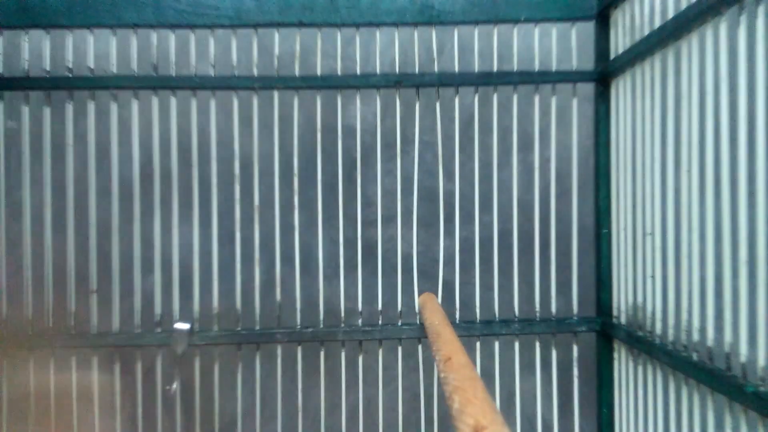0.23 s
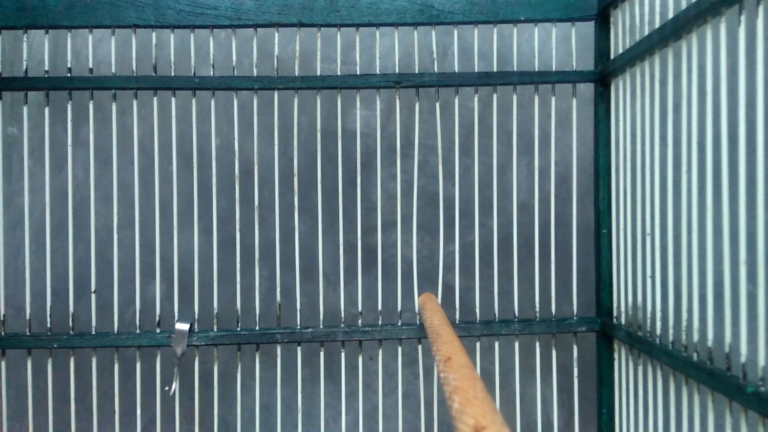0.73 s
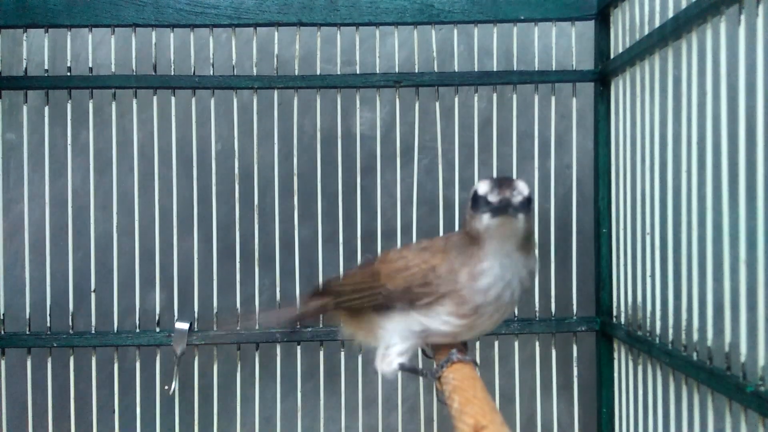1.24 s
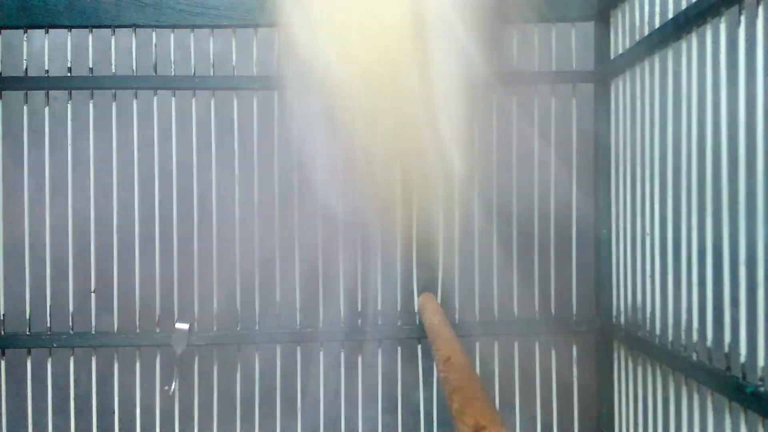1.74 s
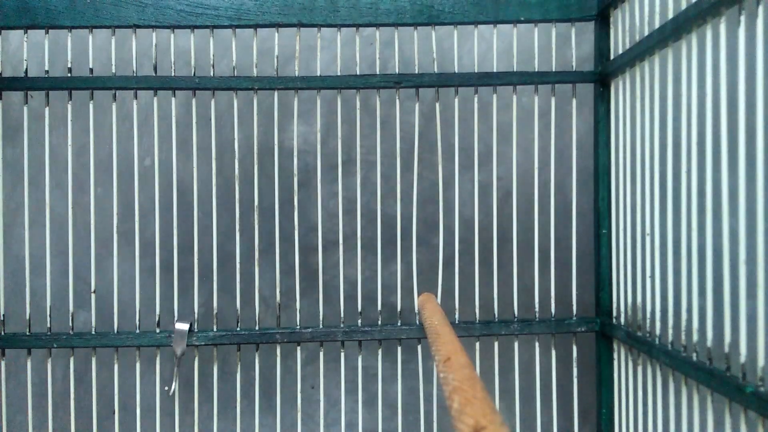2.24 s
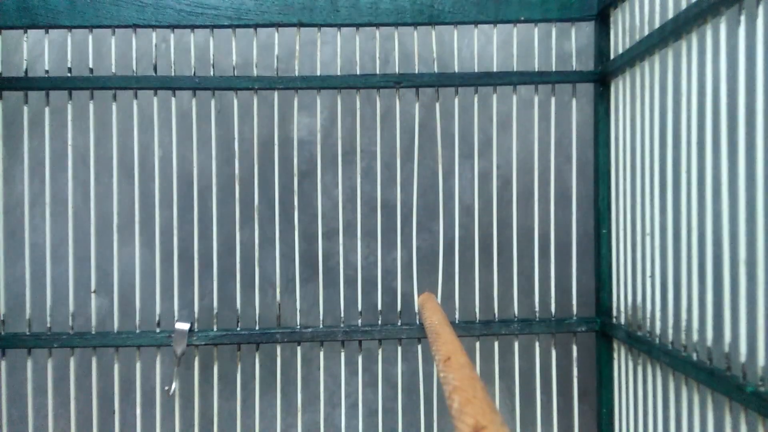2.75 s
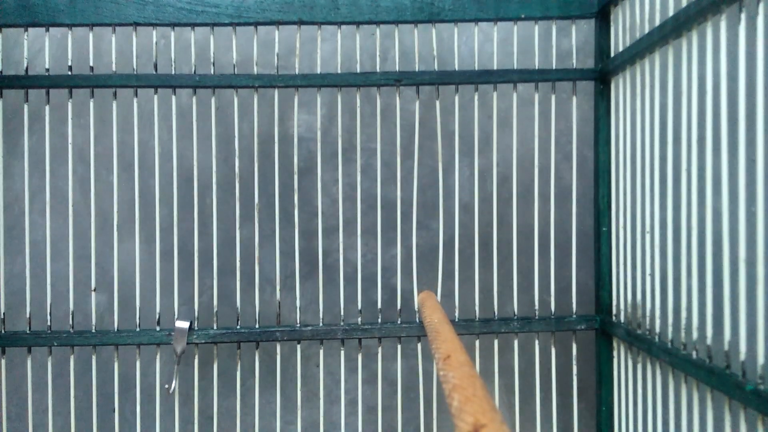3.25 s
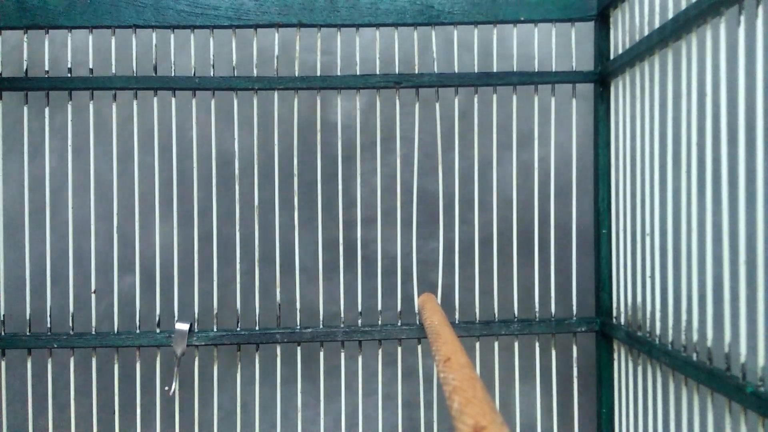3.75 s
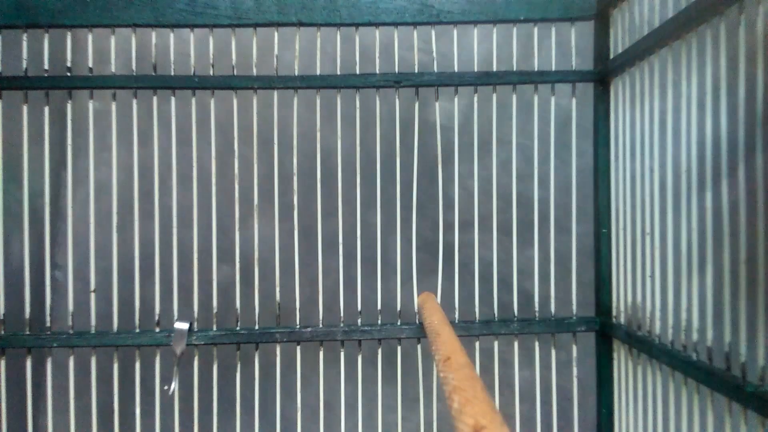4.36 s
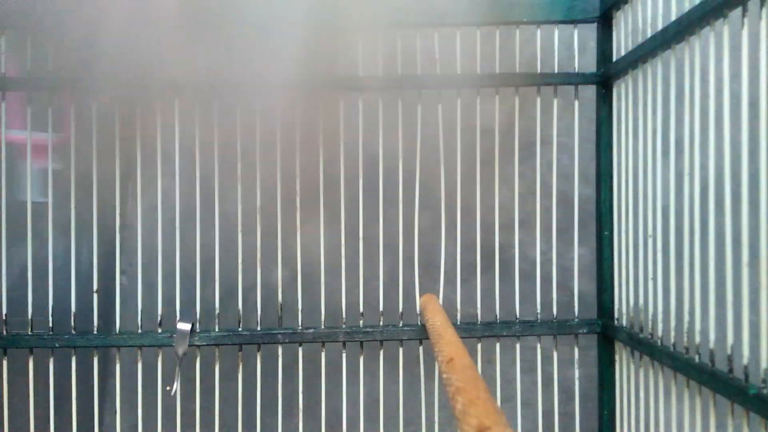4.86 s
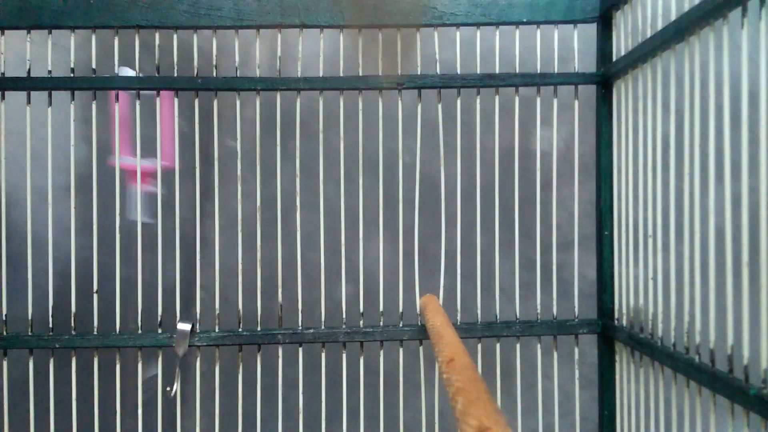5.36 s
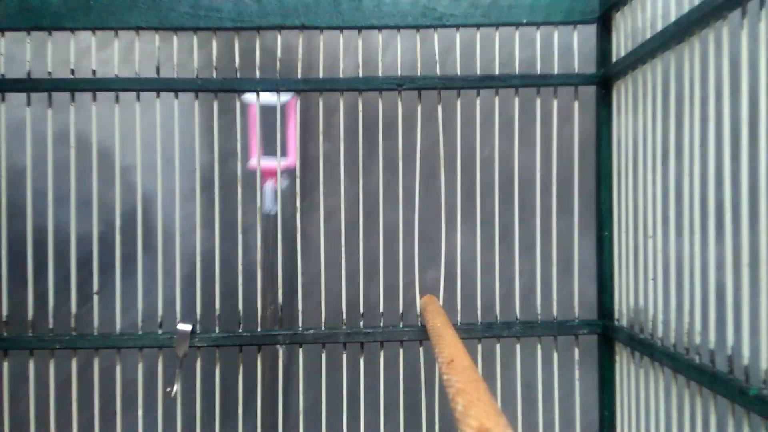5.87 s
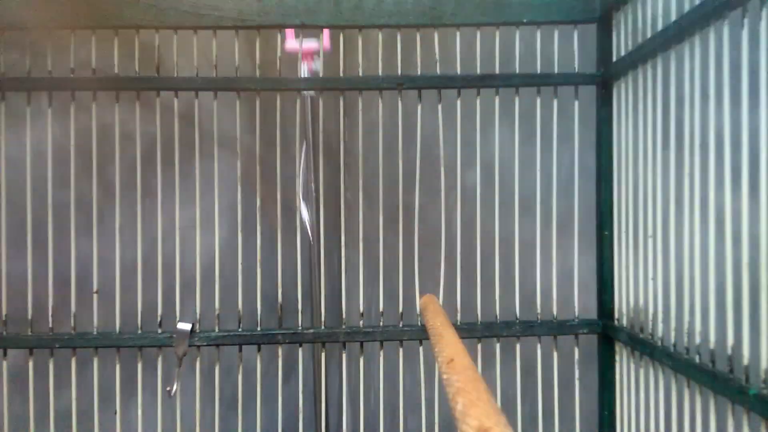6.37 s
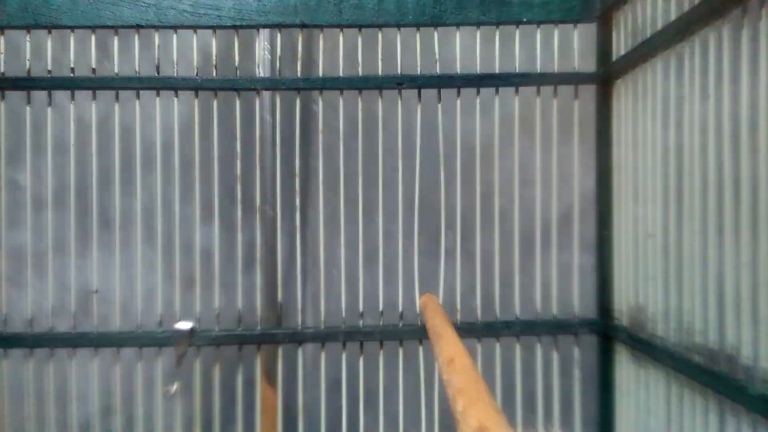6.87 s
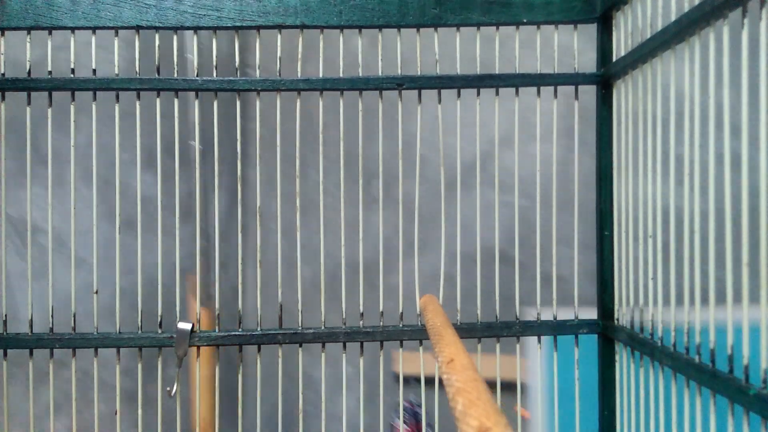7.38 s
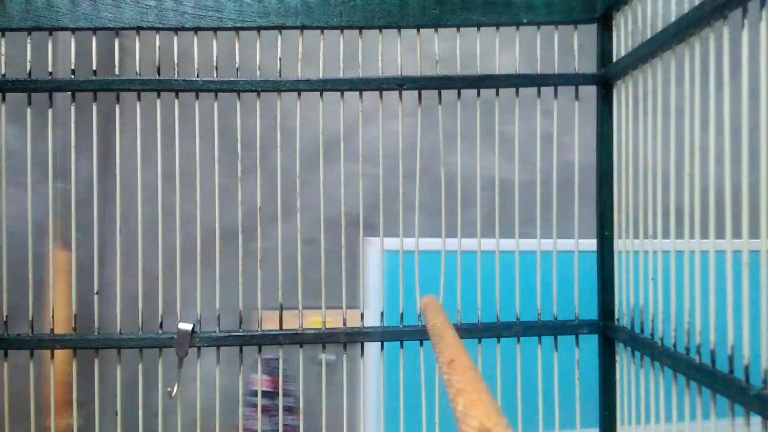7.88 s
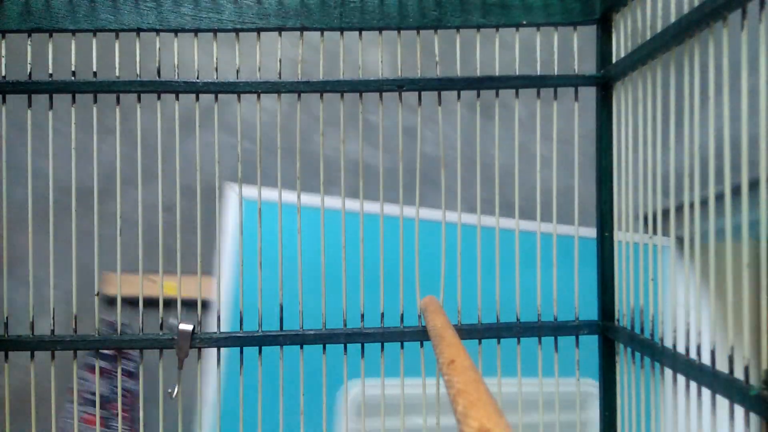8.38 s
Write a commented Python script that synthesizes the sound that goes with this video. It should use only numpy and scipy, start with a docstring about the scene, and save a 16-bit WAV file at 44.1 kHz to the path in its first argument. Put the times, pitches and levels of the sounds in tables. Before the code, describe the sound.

Right beside the microphone, a small bird flaps around a wire cage. Rapid feathery strokes hiss and rasp over the bars, thin out, then return briefly. A quiet indoor pause holds a few dull, distant knocks. Then longer, rougher fluttering breaks out with claw snaps, frame rattles and soft low puffs of air, ending in sharp clicks, faint swishes and one last short flap.

```python
"""A small bird flutters about a wire cage in several bursts, right beside the microphone.
Its feathers brush the bars as grainy noise; its claws and beak snap, scrape and ring the frame and wires.
Its wings push puffs of air: short low pressure swings in a noisy draught.
In a pause a few dull knocks, of noise and dying sines, sound farther off.
Faint swishes and a low noise floor fill the quiet room; a hiss suppressor and a band limit follow."""
import sys
import numpy as np
from scipy import signal
from scipy.fft import rfft, irfft, next_fast_len
from scipy.io import wavfile
from scipy.ndimage import uniform_filter1d

SR = 44100
rng = np.random.default_rng(int(sys.argv[2]) if len(sys.argv) > 2 else 0)


def transcribe(signal):
    """Save signal, clipped to [-1, 1], as a 16-bit WAV file at the path in sys.argv[1]."""
    frames = np.atleast_2d(signal).T
    limited = np.clip(frames, -1, 1)
    pcm = np.round(limited * 32767).astype(np.int16)
    wavfile.write(sys.argv[1], SR, pcm)


N = 381465

# Spectrum of barbs on bars: [f/Hz, relative density/dB]
HISS_SPECTRUM = [(2500, -34), (4200, -15.5), (5500, -7), (7200, 0), (8700, 5), (10500, 2), (12000, -2),
                 (14500, -4.5)]
# Spectrum of quills on bars: [f/Hz, relative density/dB]
RASP_SPECTRUM = [(900, -36), (1600, -1), (2100, 1.5), (2800, 1), (3600, -1), (4600, -4), (6000, -1),
                 (9000, -35.5)]
# Spectrum of the feather rush: [f/Hz, relative density/dB]
BODY_SPECTRUM = [(120, -13.5), (200, -14), (290, 0), (600, 1), (1000, 3.5), (1500, 2), (2100, -7),
                 (3200, -18.5), (5000, -37.5)]
# Resonances of cage and tray: [f/Hz, width/Hz, gain/dB]
CAGE_RESONANCES = [(328, 45, 4), (372, 30, -11), (452, 45, 4), (522, 40, -6), (592, 45, 3), (670, 70, -3),
                   (1030, 100, 3), (1640, 70, 2), (1980, 90, 2)]


def feathers(slide_trims_db=(1, -4, 1), stroke_trims_db=(-7, -4, -2)):
    """Many barbs drag over the bars: a fine hiss, a rasp of quills and a rush that the cage colours."""
    fine, coarse, _ = flurries()
    slides = [fine, np.sqrt(fine * coarse), coarse]  # rasp lies midway between hiss and body
    slide_gains = amp(slide_trims_db)[:, None]
    stroke_gains = amp(stroke_trims_db)[:, None]
    power = slide_gains ** 2 * slides + stroke_gains ** 2 * strokes()
    # single feathers catch and slip
    hiss, rasp, body = np.sqrt(power) * flicker(rate_hz=200, depth_db=0.34)
    high = colour(hiss * grainy(share=0.42, per_s=7600), HISS_SPECTRUM)
    middle = colour(rasp * grainy(share=0.17, per_s=820), RASP_SPECTRUM)
    low = colour(body * grainy(share=0.27, per_s=290), BODY_SPECTRUM, CAGE_RESONANCES)
    return patchy(high, depth_db=2.34, size=512) + patchy(middle + low, depth_db=2.0, size=1024)


# Spells of fluttering along the bars; levels before trims:
# [start t/s, length/s, hiss level/dB, body level/dB, draught level/dB]
FLURRY_SPELLS = [(0, .32, -41.5, -44.5, -44), (0.327, .31, -48.5, -51, -45),
                 (0.748, 0.057, -54.5, -59.5, -57), (0.916, 0.13, -57, -82, -56.5),
                 (1.807, 0.092, -54, -56, -57), (1.93, .15, -54, -53.5, -48.5),
                 (4.174, 0.25, -62, -68.5, -59.5), (4.426, 0.35, -47, -46.5, -46),
                 (4.587, 0.3, -49, -48.5, -43.5), (4.943, 0.35, -59.5, -56, -66),
                 (5.072, 0.45, -51, -58.5, -47.5), (5.563, 0.3, -43, -45, -41.5),
                 (5.895, 0.19, -38, -43, -53), (6.177, 0.05, -50.5, -49, -52),
                 (6.426, 0.11, -43.5, -43, -46), (6.527, 0.14, -53.5, -68.5, -70),
                 (6.95, 0.18, -53.5, -52.5, -49.5), (7.775, 0.38, -59.5, -67, -61),
                 (8, 0.064, -45, -46.5, -53)]
SWELL_S, SETTLE_DB_PER_S = 0.013, 176
BEATS_PER_S, BEAT_DB = 35, 3.5  # uneven small wingbeats


def flurries():
    """Power of hiss, body and draught over time: each flurry swells, holds and settles."""
    t = np.arange(3 * SR // 2) / SR
    power = np.zeros((3, N))
    for start_s, length_s, *levels_db in FLURRY_SPELLS:
        swell = np.minimum(t / SWELL_S, 1)
        settle = amp(-SETTLE_DB_PER_S * np.maximum(t - length_s, 0))
        add(power, start_s, (amp(levels_db)[:, None] * swell * settle) ** 2)
    return power * flicker(rate_hz=BEATS_PER_S, depth_db=BEAT_DB) ** 2


# Wing strokes against the bars; levels before trims:
# [t/s, hiss level/dB, rasp re hiss/dB, body re hiss/dB, t60/s]
WING_STROKES = [(0.072, -21, -18, -20, 0.12), (0.1486, -18.5, -16, -19, 0.2), (.2076, -22, -6.5, -13, 0.23),
                (0.3044, -29.5, -3, -3.5, 0.14), (.4394, -38, -12, 4.5, 0.12),
                (0.4723, -26, -22, -13.5, 0.33), (.511, -25, -12, -4, 0.1), (.5814, -39, -19, -11, 0.18),
                (.6297, -41.5, 8.5, 7, 0.047), (0.7784, -31.5, -14.5, -9, 0.43),
                (0.829, -38, -18.5, -3, 0.11), (0.952, -41.5, -20, -6, 0.4), (1.028, -46.5, -23, 0.5, 0.12),
                (1.145, -50.5, -23, -14.5, 0.33), (1.376, -54.5, -20.5, -18, 0.3),
                (1.821, -42, -25, -12, 1), (1.877, -41.5, -9.5, -2.5, 0.27), (1.9844, -37.5, -8, -20, 0.2),
                (2.0444, -31.5, -15.5, -6, 0.083), (2.096, -36.5, -10.5, -24, 0.46),
                (4.148, -48, -12, -22, 0.61), (4.2165, -43.5, -15, -5, 0.19), (4.379, -34, -3, -4, 0.09),
                (4.409, -32, 1.5, 1.5, 0.13), (4.4508, -26, -2.5, -19, 0.079), (4.562, -24.5, -3, -2, 0.11),
                (4.742, -29.5, -8.5, -3.5, 0.18), (4.7716, -27.5, -1, -5, 0.094),
                (5.0284, -39, -2, -12, 0.2), (5.114, -35, -5.5, -9.5, 0.3), (5.145, -37.5, -5, 6, 0.083),
                (5.3733, -30.5, -7, -3, 0.14), (5.471, -26, -16.5, -19.5, 0.2),
                (5.5493, -23.5, -10, -6, 0.24), (5.605, -22.5, -11, -7.5, 0.23),
                (5.662, -22.5, -15, -11.5, 0.2), (5.7716, -25, -11, -12.5, 0.24),
                (5.881, -27, -8, -3, 0.21), (5.927, -32.5, 1, 3.5, .11), (5.9436, -37, 13.5, -15, 0.064),
                (5.983, -24, -4, -14, 0.33), (6.428, -22, -2, 4, 0.074), (6.586, -24.5, -17, -13.5, 0.092),
                (6.8006, -46.5, -23, -21, 0.45), (6.862, -35, -14, -14, 0.41),
                (6.9648, -26.5, -12.5, -7, .14), (7.013, -26.5, -7, -13, 0.45),
                (7.0714, -31, 4.5, -6, 0.072), (7.869, -38.5, -26, -10.5, 0.15),
                (8.021, -23, -16, -14.5, 0.15), (8.083, -34.5, -2, -6.5, 0.24)]
STROKE_RISE_S, STROKE_LEAD_S = 0.0054, 0.001


def strokes():
    """Power of hiss, rasp and body over time: each stroke lands quickly and slides off."""
    t = np.arange(SR // 2) / SR
    power = np.zeros((3, N))
    for s, hiss_db, rasp_db, body_db, t60_s in WING_STROKES:
        shape = np.minimum(t / STROKE_RISE_S, 1) * amp(-60 * t / t60_s)
        levels_db = [[hiss_db], [hiss_db + rasp_db], [hiss_db + body_db]]
        add(power, s - STROKE_LEAD_S, (amp(levels_db) * shape) ** 2)
    return power


# Claws and beak on the cage; levels before trims:
# [t/s, snap level/dB, frame ring re snap/dB, scrape time constant before t/s, t60/s]
CAGE_CLICKS = [(0.151, -31.5, 5, .001, .05), (.476, -43, -13, .0004, .04), (0.633, -46.5, 10, .0017, 0.037),
               (0.698, -40, -10, .0013, .03), (2.167, -31, -13, .001, 0.026),
               (4.381, -31.5, 0, 0.0026, 0.022), (4.401, -26.5, -7.5, 0.00049, 0.032),
               (4.414, -34, -18, .0013, .02), (4.44, -27.5, -2, .0005, 0.027),
               (4.53, -20.5, -12, .0002, 0.011), (4.566, -24, 1, .0015, .022),
               (4.578, -23, -4, 0.00029, 0.021), (4.6645, -21, -0.5, .0002, 0.023),
               (4.716, -21.5, 3, 0.00049, 0.042), (4.863, -35.5, -20, .0007, 0.019),
               (5.151, -37.5, 2, .003, .05), (5.262, -32.5, -24, .0011, .025),
               (5.565, -20, -14.5, 0.00046, 0.015), (6.007, -27, -3, .001, .03),
               (6.203, -19.5, -2, 0.0029, 0.035), (6.227, -28, -21, 0.0012, 0.049),
               (6.335, -33.5, 9, 0.0027, 0.29), (6.368, -21.5, 2, 0.0032, 0.07),
               (6.437, -22.5, 6.5, 0.0077, 0.11), (6.862, -34, -13.5, 0.0012, 0.014),
               (7.031, -12, -10, 0.00073, 0.023), (7.1338, -10.5, -10, 0.00016, 0.0034),
               (7.138, -26, 0, .0015, 0.04), (7.18, -42.5, 9.5, .002, .031),
               (7.234, -40, 1, 0.00086, 0.032), (7.806, -41, 6.5, 0.0009, 0.11),
               (7.822, -38.5, -9, 0.00055, 0.056), (8.023, -32, -5, 0.001, 0.025)]
# Spectrum of a snap: [f/Hz, relative density/dB]
SNAP_SPECTRUM = [(300, -16), (1200, -12), (2700, 1), (4200, -7.5), (6000, -3), (8500, 3.5), (11000, -3),
                 (14500, -4)]
# Modes of the cage frame: [f/Hz, relative level/dB, t60/s]
FRAME_MODES = [(500, -12.5, 0.052), (603, -22, 0.058), (840, -1, 0.019), (1047, -8.5, 0.01),
               (1225, -2.5, 0.035), (1560, -4, 0.017), (1840, -9.5, 0.011)]


def claws(snap_trim_db=-2, frame_trim_db=-5, frame_rise_s=0.0023, min_t60_s=0.004):
    """A claw or beak scrapes, snaps against a bar with a brief chatter and rings the cage frame."""
    lead = SR // 40
    t = np.arange(-lead, SR // 4) / SR
    before, after = np.minimum(t, 0), np.maximum(t, 0)
    chatter = flicker(rate_hz=2300, depth_db=3)
    snaps, frame = np.zeros((2, N)), np.zeros((2, N))
    for s, db, ring_db, scrape_s, t60_s in CAGE_CLICKS:
        start_s = s - lead / SR
        shape = np.exp(before / scrape_s) * amp(-60 * after / max(t60_s, min_t60_s))
        snap = shape * noise(len(t)) * chatter[round(s * SR):][:len(t)]
        # the blow sets the energy
        snap *= np.linalg.norm(shape) / np.linalg.norm(snap, axis=1, keepdims=True)
        add(snaps, start_s, amp(db + snap_trim_db) * snap)
        onset = np.minimum(after / frame_rise_s, 1)
        add(frame[0], start_s, amp(db + ring_db + frame_trim_db) * ring(FRAME_MODES, after) * onset)
    return colour(snaps, SNAP_SPECTRUM) + frame


# Plucked wires and bars: [t/s, f/Hz, level/dB, t60/s]
WIRE_PINGS = [(1.097, 3060, -58, 0.038), (1.372, 1245, -62, .08), (2.097, 9560, -39, .14),
              (2.165, 2685, -36, 0.045), (2.166, 8780, -41, 0.099), (2.165, 9800, -42.5, 0.19),
              (4.564, 1415, -10, 0.01), (4.566, 1810, -15, 0.015), (4.666, 1040, -19.5, 0.022),
              (4.715, 1400, -16, 0.018), (5.03, 3300, -45, 0.055), (5.473, 9370, -29.5, 0.15),
              (6.333, 970, -27, 0.027), (7.029, 2795, -31, 0.022), (7.029, 6050, -23.5, .03),
              (7.134, 1006, -28, 0.022)]


def wires(spread=0.034, count=15, rise_s=0.0015):
    """A plucked bar rattles together with its slightly detuned neighbours."""
    t = np.arange(SR // 2) / SR
    out = np.zeros((2, N))
    for s, hz, db, t60_s in WIRE_PINGS:
        # outermost neighbours: 9 dB down
        bars = [(hz * (1 + spread * k), -9 * abs(k), t60_s) for k in np.linspace(-1, 1, count)]
        pair = np.array([ring(bars, t), ring(bars, t)])  # mid and side
        add(out, s, amp(db) * pair * np.minimum(t / rise_s, 1))
    return out


# Wingbeats that fan the microphone; level before smoothing:
# [centre t/s, level/dB, pressure swing f/Hz, length/s]
WING_PUFFS = [(.072, -38, 85, 0.014), (0.298, -38, 72, 0.021), (0.511, -38, 90, 0.0072),
              (.936, -49, 320, 0.014), (1.006, -44.5, 332, 0.017), (1.857, -33.5, 57, 0.038),
              (1.949, -30, 154, 0.0068), (1.956, -31, 72, 0.033), (3.8, -59.5, 158.3, 0.023),
              (4.576, -28.5, 78, 0.016), (4.721, -28, 70.4, 0.025), (4.809, -31.5, 119, 0.011),
              (4.841, -33, 60, 0.033), (4.9, -37, 67, 0.033), (5.141, -45, 73, 0.043),
              (5.233, -37.5, 58, 0.065), (5.386, -33, 148, 0.028), (5.422, -40.5, 77, .03),
              (5.6, -36, 78, 0.015), (5.725, -32, 95, 0.011), (5.874, -43, 84, 0.014),
              (6.433, -34, 155, 0.032), (6.483, -24.5, 111, 0.037), (6.485, -21.5, 188, 0.0075),
              (6.496, -31, 94.5, 0.024), (6.995, -32, 60, 0.043)]
# Spectrum of the draught: [f/Hz, relative density/dB]
AIR_SPECTRUM = [(15, -35.5), (35, -11), (60, 3.5), (85, -4), (110, -4.5), (160, -6), (230, -16),
                (400, -28.5), (900, -60.5)]


def air(draught_trim_db=-2, stroke_air_db=-9, wake_db=-9, wake_stretch=1.1):
    """Wingbeats push short pressure swings through a lumpy draught; each stroke and puff stirs it further."""
    swings = np.zeros((2, N))
    body_power = strokes()[2]
    draught_power = flurries()[2]
    stirred = amp(draught_trim_db) ** 2 * draught_power + amp(stroke_air_db) ** 2 * body_power
    lead = SR // 10
    t = np.arange(-lead, lead) / SR
    for s, db, hz, length_s in WING_PUFFS:
        start_s = s - lead / SR
        swing = np.sin(2 * np.pi * hz * t) * np.exp(-(2 * t / length_s) ** 2)
        eddies = 1 + 0.15 * unit(uniform_filter1d(rng.standard_normal(len(t)), size=90))
        add(swings[0], start_s, amp(db) * uniform_filter1d(swing * eddies, size=40))
        wake = np.exp(-(2 * t / (wake_stretch * length_s)) ** 2)
        add(stirred, start_s, amp(db + wake_db) ** 2 * wake)
    return swings + colour(np.sqrt(stirred) * noise(), AIR_SPECTRUM)


# Knocks across the room:
# [t/s, thud level/dB, low bump level/dB, hollow ring level/dB, rise/s, thud and bump t60/s]
FAR_KNOCKS = [(2.521, -56, -54, -33, 0.013, 0.86), (2.884, -60.5, -56.5, -56, 0.013, 0.62),
              (2.919, -59.5, -47, -61, 0.0067, 0.42), (3.161, -37, -54, -57, 0.0021, 0.42)]
# Spectrum of the thud: [f/Hz, relative density/dB]
THUD_SPECTRUM = [(30, -30.5), (100, -13), (200, -11), (330, -8), (700, -8), (1000, -3), (1500, -10),
                 (2500, -19), (4500, -31.5), (8500, -26), (14000, -45)]
# Spectrum of the low bump: [f/Hz, relative density/dB]
BUMP_SPECTRUM = [(20, -36), (50, 5.5), (100, 1), (170, -0.5), (260, -13.5), (420, -5), (1000, -37.5)]
# Modes of the hollow object: [f/Hz, relative level/dB, t60/s]
HOLLOW_MODES = [(303.4, 2, 0.17), (463, -2.5, 0.089), (648.6, -6.5, 0.39), (715, -1, 0.53), (765, -7, 0.21),
                (956, -3, 0.18), (1079, -1, 0.26), (1110, 3.5, 0.11), (1183, -14, 0.42), (1370, -10, 0.21),
                (1480, -10, 0.23)]


def knocks(ring_room_db=-2, rough=0.49):
    """Far blows arrive smeared, with a low bump through the floor; the first rings hollow the loudest."""
    t = np.arange(SR) / SR
    thuds, bumps, rings = np.zeros((3, 2, N))
    for s, thud_db, bump_db, ring_db, rise_s, t60_s in FAR_KNOCKS:
        onset = np.minimum(t / rise_s, 1)
        fade = onset * amp(-60 * t / t60_s)
        rattle = 1 + rough * unit(uniform_filter1d(rng.standard_normal(len(t)), size=110))
        add(thuds, s, amp(thud_db) * fade * noise(len(t)))
        add(bumps, s, amp(bump_db) * fade * noise(len(t)))
        add(rings[0], s, amp(ring_db) * onset * rattle * ring(HOLLOW_MODES, t))
    direct = colour(thuds, THUD_SPECTRUM) + colour(bumps, BUMP_SPECTRUM) + rings
    return direct + amp(ring_room_db) * room(rings)


# Faint swishes from the room:
# [t/s, length/s, centre f/Hz, width/Hz, band level/dB, fizz level/dB]
ROOM_SCUFFS = [(1.151, 0.97, 852, 607, -75.5, -90.5), (1.628, 0.14, 1078, 109, -67, -81.5),
               (2.553, .063, 5640, 2000, -76, -67.5), (3.734, 0.19, 2280, 600, -66, -81),
               (3.741, 0.23, 2870, 3440, -65, -70), (3.979, 0.24, 1723, 1740, -66.5, -67),
               (4.846, 0.42, 1497, 1110, -55.5, -76), (7.189, 0.35, 779, 220, -69.5, -63),
               (7.384, 0.18, 1520, 600, -51.5, -85), (7.51, 0.26, 1707, 915, -55.5, -61.5),
               (7.611, 0.18, 976, 236, -60.5, -68), (8.362, 0.13, 1088, 1123, -68, -66)]


def scuffs():
    """Each swells and fades: a soft band of noise with a little fizz on top."""
    t = np.arange(SR // 2) / SR
    bands, fizz = np.zeros((2, N)), np.zeros((2, N))
    for s, length_s, hz, width_hz, band_db, fizz_db in ROOM_SCUFFS:
        swell = np.sin(np.pi * np.minimum(t / length_s, 1) ** 0.52)
        lowpass = signal.butter(3, width_hz / 2, fs=SR, output="sos")
        a, b = signal.sosfilt(lowpass, noise(len(t)))
        phase = 2 * np.pi * hz * t
        band = unit(a * np.cos(phase) + b * np.sin(phase))  # low noise shifted up to hz
        add(bands[0], s, amp(band_db) * swell * band)
        add(fizz, s, amp(fizz_db) * swell * noise(len(t)))
    return patchy(bands + colour(fizz, HISS_SPECTRUM), depth_db=2.0, size=1024)


# Decay of the room: [f/Hz, t60/s]
ROOM_DECAY = [(100, 0.52), (500, 0.3), (1500, 0.28), (4000, 0.23), (9000, 0.32), (14000, 0.11)]


def room(x):
    """A diffuse tail, fed by mid, in which each band dies at its own speed."""
    taps = noise(SR * 3 // 4)
    taps[:, :200] = 0  # gap before the tail
    hz, t, z = signal.stft(taps, SR, nperseg=256)
    decay = amp(-60 * t / read(ROOM_DECAY, hz)[:, None])
    tail = signal.istft(z * decay, SR, nperseg=256)[1]
    return signal.oaconvolve(x[:1], tail / np.linalg.norm(tail[0]), axes=1)[:, :N]


# Spectrum of the quiet room: [f/Hz, relative density/dB]
ROOM_TONE_SPECTRUM = [(20, -24.5), (50, -10), (110, -7.5), (250, -23), (420, -15.5), (650, -12.5),
                      (1100, -16), (1600, -16), (2500, -20.5), (5000, -24.5), (9000, -24), (14500, -34)]
ROOM_TONE_DB = -71.5


def room_tone():
    """Steady coloured noise whose spectrum wavers slightly."""
    return amp(ROOM_TONE_DB) * patchy(colour(noise(), ROOM_TONE_SPECTRUM), depth_db=1.0, size=1024)


def amp(db):
    """Amplitude factor of a level in dB."""
    return 10 ** (np.asarray(db) / 20)


def unit(x):
    """Scales to rms 1."""
    return x / np.sqrt(np.mean(x ** 2) + 1e-20)


def read(points, hz):
    """Reads a table along log frequency."""
    f, value = np.transpose(points)
    return np.interp(np.log(hz + 1), np.log(f + 1), value)


def add(mix, s, sound):
    """Lays a sound into a mix at time s."""
    part = mix[..., max(round(s * SR), 0):][..., :sound.shape[-1]]
    part += sound[..., :part.shape[-1]]


def noise(count=N):
    """White noise for mid and side."""
    return rng.standard_normal((2, count))


def grainy(share, per_s):
    """Noise of rms about 1 in which single barbs snap over a smooth rush."""
    snaps = noise() * (rng.random(N) < per_s / SR)
    return np.sqrt(1 - share) * noise() + np.sqrt(share) * unit(snaps)


def flicker(rate_hz, depth_db):
    """A random gain of rms 1 that changes about rate_hz times a second."""
    steps = rng.standard_normal(N // 8)
    position = np.arange(N) / SR * rate_hz
    return unit(amp(depth_db * np.interp(position, np.arange(len(steps)), steps)))


def ring(modes, t):
    """Dying sines of unit starting rms, each slightly detuned at random."""
    hz, db, t60_s = np.transpose(modes)[:, :, None]
    detune = 1 + 0.01 * rng.uniform(-0.55, 1, hz.shape)
    waves = np.sin(2 * np.pi * (hz * detune * t + rng.random(hz.shape)))
    total = (amp(db - 60 * t / t60_s) * waves).sum(0)
    return total / np.sqrt(np.sum(amp(db) ** 2) / 2)


def colour(x, spectrum, resonances=()):
    """Causal filter of unit energy with a broad spectrum and narrow resonances."""
    hz = np.fft.rfftfreq(8192, 1 / SR)
    db = read(spectrum, hz) + sum(g / (1 + (2 * (hz - f) / w) ** 2) for f, w, g in resonances)
    log_gain = np.log(amp(np.r_[db, db[-2:0:-1]]))
    minimum_phase = np.exp(np.conj(signal.hilbert(log_gain)))
    taps = np.fft.ifft(minimum_phase).real[:4096]
    return signal.oaconvolve(x, taps[None] / np.linalg.norm(taps), axes=1)[:, :N]


def patchy(x, depth_db, size):
    """The colour shifts from moment to moment in broad and narrow patches."""
    z = signal.stft(x, nperseg=size)[2]
    fields = rng.standard_normal((2,) + z.shape[1:])
    narrow, broad = uniform_filter1d(fields, size=5, axis=2)
    patches = unit(uniform_filter1d(narrow, size=3, axis=0)) + unit(uniform_filter1d(broad, size=14, axis=0))
    return signal.istft(z * unit(amp(depth_db * patches)), nperseg=size)[1][:, :N]


# Stereo width: [f/Hz, side re mid/dB]
SIDE_LEVEL = [(20, -61.5), (2800, -77.5), (4200, -40.5), (6000, -14.5), (9000, -5.5), (14000, -8)]


def scene(feather_room_db=-12, click_room_db=-17, scuff_room_db=-9):
    """Everything is mixed as mid and side; only the treble has width."""
    wings, contacts, far = feathers(), claws() + wires(), scuffs()
    sends = amp(feather_room_db) * wings + amp(click_room_db) * contacts + amp(scuff_room_db) * far
    mid, side = wings + contacts + room(sends) + air() + knocks() + far + room_tone()
    size = next_fast_len(N)
    side_gain = amp(read(SIDE_LEVEL, np.fft.rfftfreq(size, 1 / SR)))
    side = irfft(rfft(side, size) * side_gain, size)[:N]
    return np.array([mid + side, mid - side])


def suppress(x, threshold_db=-63, most_db=9, corner_hz=2800):
    """A hiss suppressor turns the treble down whenever it is faint."""
    highpass = signal.butter(2, corner_hz, "high", fs=SR, output="sos")
    treble = signal.sosfiltfilt(highpass, x)
    power = abs(uniform_filter1d((treble ** 2).mean(0), size=900))
    power_db = 10 * np.log10(power + 1e-14)
    cut_db = np.clip(threshold_db - power_db, 0, most_db)  # dB for dB below threshold
    return x + treble * (amp(-cut_db) - 1)


EDGE_HZ = 14480


def record(dry):
    """Hiss suppression, then the recorder's band limit."""
    lowpass = signal.firwin(601, EDGE_HZ, window=("kaiser", 8), fs=SR)
    return signal.oaconvolve(suppress(dry), lowpass[None], "same")


dry = scene()
out = record(dry)
transcribe(out)
```